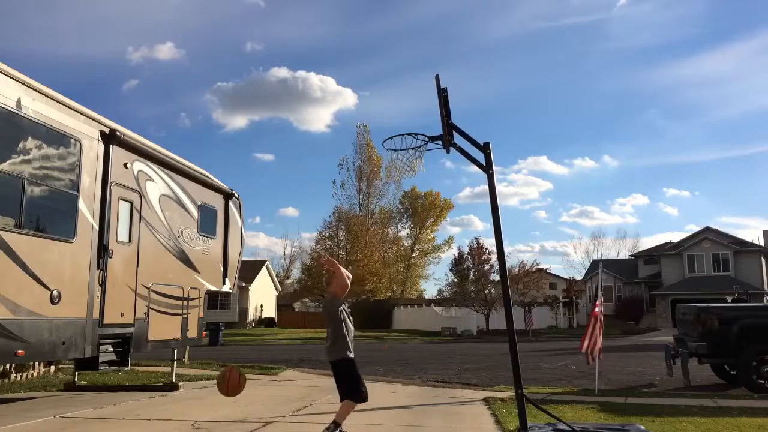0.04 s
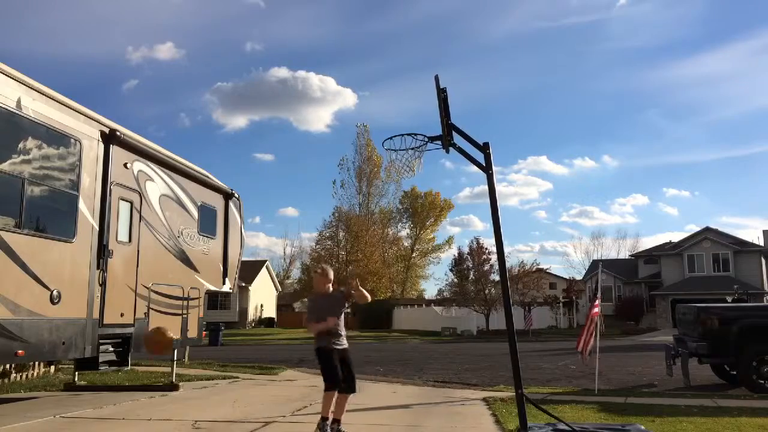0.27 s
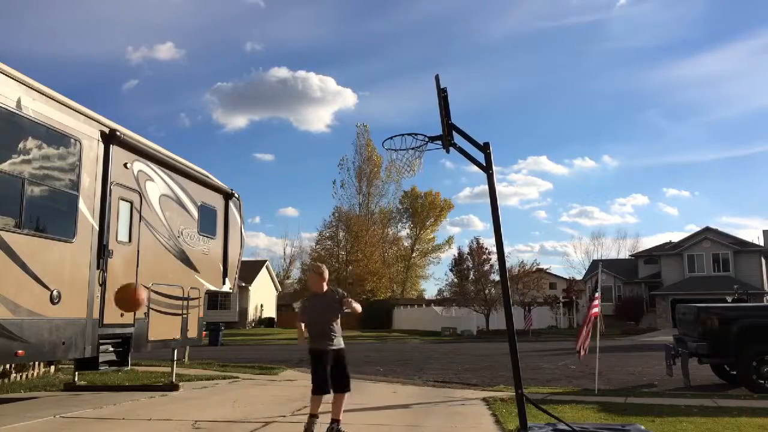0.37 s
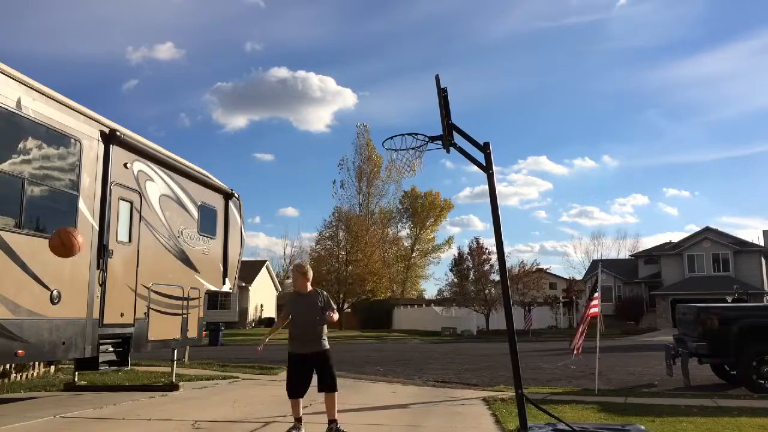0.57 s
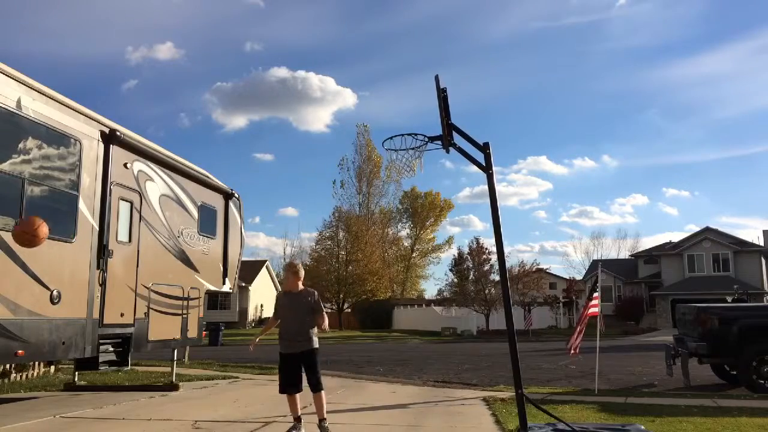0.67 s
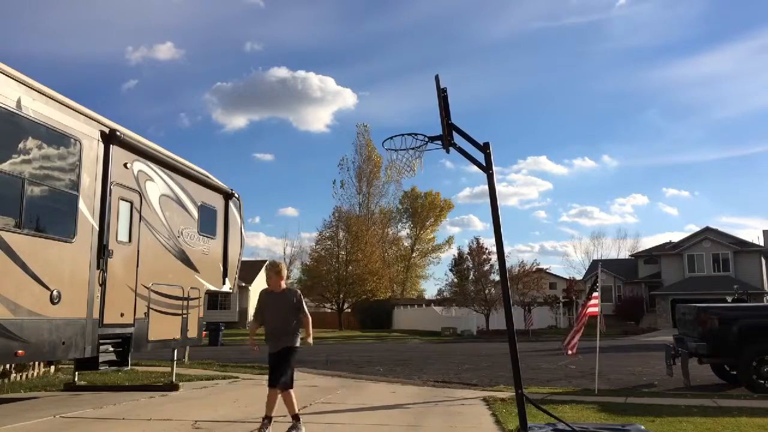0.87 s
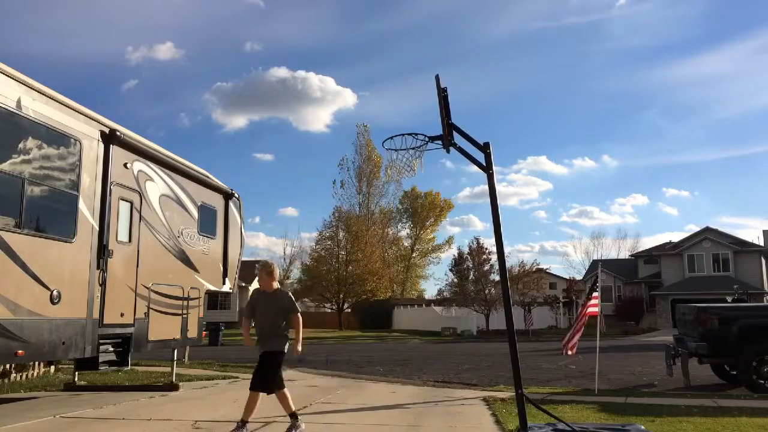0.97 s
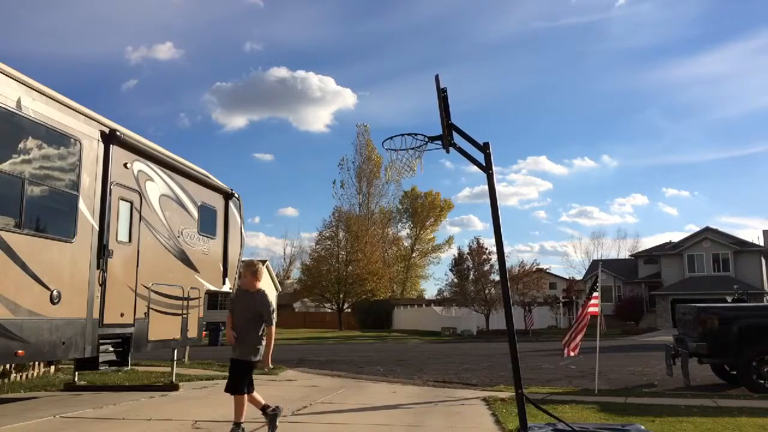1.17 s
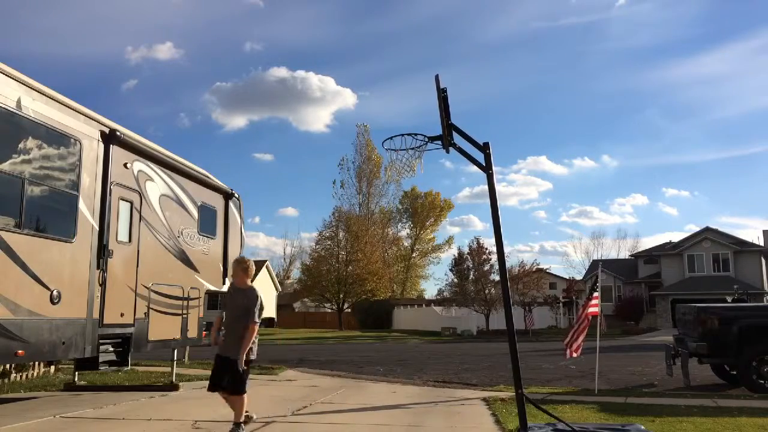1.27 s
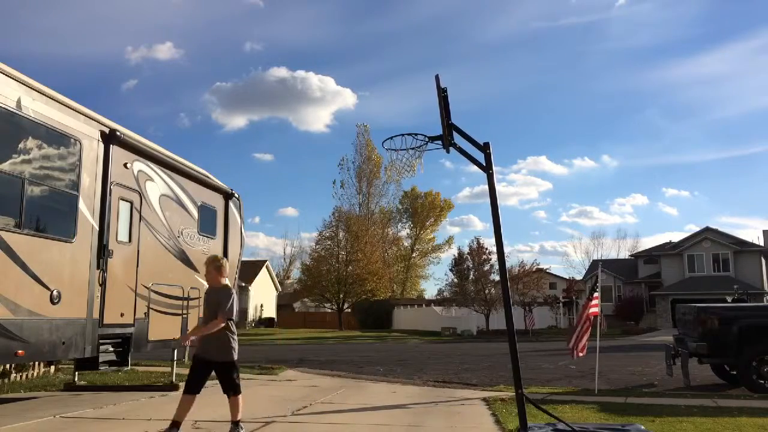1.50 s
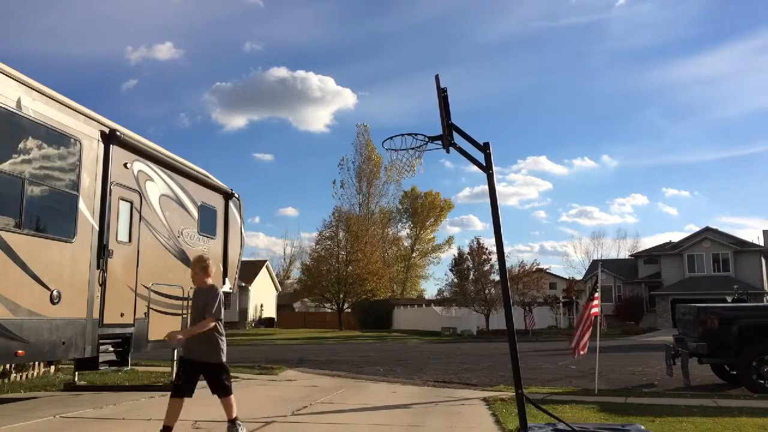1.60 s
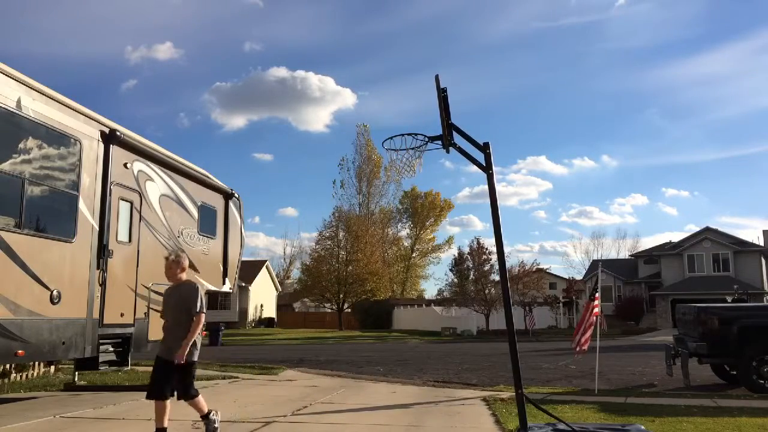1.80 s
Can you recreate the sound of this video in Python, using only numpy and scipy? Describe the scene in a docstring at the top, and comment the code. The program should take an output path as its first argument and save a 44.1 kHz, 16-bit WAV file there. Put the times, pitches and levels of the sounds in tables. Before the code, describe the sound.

A basketball bounces twice on a concrete driveway, close to the microphone. The first thud dies quickly and the second sets off a hollow boom. Faint steps and scuffs follow each, over a low hum of distant traffic.

```python
"""Basketball bouncing twice on a driveway

A basketball bounces twice on concrete, close by: a noisy slap, a low thump and decaying sines for the ball's ring.
The first bounce dies quickly in the open; the second sets a hollow space booming, probably an open garage,
made of fading noise and standing waves. Shoes step and scuff further off, as shaped bursts of noise,
over the hum of distant traffic, a steady noise."""
import sys
import numpy as np
from scipy import signal
from scipy.io import wavfile

SR = 44100
rng = np.random.default_rng(int(sys.argv[2]) if len(sys.argv) > 2 else 0)


def log_audio(samples):
    """Write samples as a 16-bit WAV file to the path given in sys.argv[1]."""
    # one column per channel
    frames = np.atleast_2d(samples).T
    # limit to full scale, then quantise
    limited = np.clip(frames, -1, 1)
    pcm = np.round(limited * 32767).astype(np.int16)
    wavfile.write(sys.argv[1], SR, pcm)


N = 81585  # length in samples
T = np.arange(N) / SR  # time in seconds


def bounce(start_s, level_db, slap_db, thump_hz, ring_ratio, echo_s, echo_db, scatter_db, tail_db):
    """The ball squeezes the air under it, slaps, thumps and rings; a near wall repeats it, which sounds hollow."""
    # ring of the ball's skin and the air inside it, before the bounce's pitch ratio: pitch_hz, level_db, t60_s
    ball_modes = [(171.5, -25, .1), (296.2, -20.5, 0.052), (384, -29.5, 0.0804), (601.6, -24, 0.084),
                  (730, -42, 0.048), (938, -49.5, .15), (1058, -37, 0.064), (1160, -38, .1),
                  (1365, -25.5, 0.051), (1630, -30, 0.051), (1827, -33.5, 0.052), (2502, -36, 0.041),
                  (2818, -32, 0.052), (2940, -36, .09), (5324, -40.5, .1)]
    # gritty crack of the skin on concrete: pitch_hz, level_db (per octave), t60_s
    crack_colour = [(500, -40.5, 0.019), (1501, -27.5, 0.042), (3003, -23.5, .014), (5030, -20.5, 0.017),
                    (7870, -22, 0.015), (12500, -16.5, 0.011), (15000, -27.5, 0.022)]
    # spray of reflections from the ground and things nearby: pitch_hz, level_db (per octave)
    spray_colour = [(200, -49), (500, -30.5), (900, -40.5), (1800, -30.5), (3000, -38), (5000, -26),
                    (8000, -30.5), (14000, -34.5)]
    slap_lag_s, body_lag_s = 0.00015, 0.0003

    # The air pressure builds up to the hit, then stops short.
    squeeze_shape = np.exp(-np.abs(T - start_s) / 0.0024) * (T < start_s + slap_lag_s)
    squeeze = -from_db(-23.5) * squeeze_shape

    # The slap is a very short pulse that swings back more weakly.
    slap_width_s, recoil_lag_s, recoil_share = 0.000028, 0.00018, 0.4
    hit = np.exp(-((T - slap_lag_s) / slap_width_s) ** 2 / 2)
    recoil = np.exp(-((T - slap_lag_s - recoil_lag_s) / slap_width_s) ** 2 / 2)
    slap = from_db(0.5) * (recoil_share * recoil - hit)
    crack = delay(noise(crack_colour), body_lag_s)

    thump = ring([(thump_hz, -14, 0.065)])
    tuned_modes = [(hz * ring_ratio, db, t60_s) for hz, db, t60_s in ball_modes]
    body = delay(thump + ring(tuned_modes), body_lag_s)

    # Two separate sprays: one direct, one scattered back by the wall.
    spray_shape = swell(0.00094) * fade(0.065)
    spray = noise(spray_colour) * spray_shape
    scatter = noise(spray_colour) * spray_shape
    wall = delay(from_db(echo_db) * body + from_db(scatter_db) * scatter, echo_s)

    impact = from_db(slap_db) * (slap + crack + spray)
    sound = impact + body + wall + from_db(tail_db) * outdoors()
    return from_db(level_db) * (squeeze + delay(sound, start_s))


def garage():
    """The hollow space answers late with a long boom, standing waves and a few wall slaps."""
    # diffuse boom: pitch_hz, level_db (per octave), t60_s
    boom_colour = [(45, -47.5, 3.2), (107.3, -26, 0.83), (168, -26, 1.03), (270, -29.5, 1.02),
                   (460, -39.5, 1.33), (770, -44.5, 1.5), (1700, -39.5, 0.77), (2690, -43.5, 0.88),
                   (3770, -47.5, 0.48), (7400, -52.5, 0.64), (13900, -82, 0.26)]
    # standing waves between the walls: pitch_hz, level_db, t60_s
    standing_waves = [(91.5, -34.5, 0.35), (144.8, -25.5, 1.18), (155.3, -47, 0.62), (226.6, -34, 1.5),
                      (248.7, -34, .8), (285, -41.5, 3.3), (372, -44.5, 1.37), (604, -49.5, 1.4),
                      (949, -45, 1.08), (1340, -49, 0.44), (1770, -44, 0.77)]
    # slaps off the walls: delay_s, level_db
    wall_slaps = [(0.055, 3.5), (.075, 3.5), (.156, 0.5), (.244, -10.5), (.283, -19)]
    # colour of a wall slap: pitch_hz, level_db (per octave), t60_s
    slap_colour = [(298, -52, 0.093), (990, -48.5, 0.1), (2280, -40.5, .22), (4900, -49, 0.14),
                   (8950, -52.5, 0.078), (14000, -60, 0.077)]
    boom = (noise(boom_colour) + ring(standing_waves)) * swell(0.016)
    sound = delay(boom, 0.052)
    for delay_s, level_db in wall_slaps:
        slap = noise(slap_colour) * swell(0.00089)
        sound = sound + from_db(level_db) * delay(slap, delay_s)
    return sound


def outdoors():
    """The driveway answers at once, the house front soon after, the far side of the street last."""
    # All three tables: pitch_hz, level_db (per octave), t60_s
    # tail between the camper and the house
    driveway = [(50, -40, 0.42), (112.5, -28, 0.41), (171.8, -33, .33), (254, -36.5, 0.4),
                (520, -32.5, 0.3), (970, -40.5, .38), (2010, -40.5, 0.4), (3970, -41.5, 0.33),
                (8000, -42, .25), (14200, -46, .21)]
    # dull answer of the house front
    house = [(50, -44, 0.096), (110, -39.5, 0.14), (220, -51.5, .22), (432, -47, 0.27), (608, -33.5, .26),
             (890, -54, 0.11), (3000, -75, 0.082), (12000, -67, 0.23)]
    # faint return from the houses across the street
    street = [(60, -66.5, 1.7), (124, -51.5, 1), (283, -77, 1.7), (600, -68, 1.1), (1960, -73.5, 1.8),
              (3700, -75, 0.72), (5600, -78.5, 1.4), (12000, -101, 0.48)]
    near = noise(driveway) * swell(0.005)
    front = delay(noise(house) * swell(0.016), 0.072)
    far = delay(noise(street) * swell(0.0073), 0.225)
    return near + front + far


def step(start_s, level_db, rise_s, t60_s, tilt_db):
    """A sole rubs or knocks the concrete: a noise burst with its own onset, decay and brightness."""
    # colour of a sole on concrete, before the tilt: pitch_hz, level_db (per octave)
    shoe_colour = [(40, -49), (150, -22), (300, -3), (550, -1.5), (1000, -9), (2300, 2.5), (5000, -4.5),
                   (9000, -12.5), (14000, -8.5)]
    pivot_hz = 1960  # the tilt leaves this pitch unchanged
    tilted = [(hz, db + tilt_db * np.log2(hz / pivot_hz)) for hz, db in shoe_colour]
    burst = noise(tilted) * swell(rise_s) * fade(t60_s)
    return from_db(level_db) * delay(burst, start_s)


def traffic():
    """Many distant vehicles blur into a steady low noise."""
    # colour of the hum: pitch_hz, level_db (per octave)
    hum_colour = [(25, -69), (60, -65), (130, -54.5), (250, -68), (450, -64), (750, -59), (1200, -63),
                  (2000, -75), (4000, -82.5), (8000, -82.5), (14000, -84.5)]
    return noise(hum_colour)


def ring(modes):
    """Struck modes as decaying sines; neighbours swing in opposite directions."""
    sound = 0
    for k, (hz, db, t60_s) in enumerate(modes):
        sine = np.sin(2 * np.pi * hz * T)
        sound = sound + (-1) ** k * from_db(db) * fade(t60_s) * sine
    return sound


def noise(table):
    """Third-octave bands of noise at the table's levels; with a t60 column each band dies at its own rate."""
    hz, db, *t60_s = np.transpose(table)
    # Neighbouring bands take turns between two independent noises.
    white = rng.standard_normal((2, N + SR // 4))
    edges = 22 * 2 ** (np.arange(30) / 3)
    out = 0
    for k, (low, high) in enumerate(zip(edges, edges[1:])):
        band_filter = signal.butter(2, [low, high], "band", fs=SR, output="sos")
        band = signal.sosfilt(band_filter, white[k % 2])[-N:]  # drop the filter's start-up
        band = band / band.std() / np.sqrt(3)  # three bands share an octave's power
        centre = np.log(low * high) / 2  # middle pitch, as a logarithm
        band = band * from_db(np.interp(centre, np.log(hz), db))
        if t60_s:
            band = band * fade(np.interp(centre, np.log(hz), t60_s[0]))
        out = out + band
    return out


def from_db(db):
    """Decibels to gain."""
    return 10 ** (np.asarray(db) / 20)


def fade(t60_s):
    """Exponential decay by 60 dB in t60_s, which is at least 2 ms."""
    return from_db(-60 * T / np.maximum(t60_s, 0.002))


def swell(rise_s):
    """Smooth onset that reaches about 63 % after rise_s."""
    return 1 - np.exp(-(T / max(rise_s, 1e-5)) ** 2)


def delay(x, delay_s):
    """The same sound, delay_s seconds later."""
    silence = np.zeros(max(int(round(delay_s * SR)), 0))
    return np.concatenate([silence, x])[:N]


def scene():
    """Bounces with the garage's answer, footsteps and traffic."""
    # bounces: start_s, level_db, slap_db, thump_hz, ring_pitch_ratio, wall_echo_delay_s, wall_echo_db,
    # echo_spray_db, driveway_tail_db, garage_db
    bounces = [(0.2086, 0.5, -5, 99.2, 0.95, .0073, 0, -2.5, 3, -68),
               (1.3504, -1.5, -2.5, 114.4, 0.99, .0068, 1, -10.5, 1, -0.5)]
    # shoes on concrete: start_s, level_db, rise_s, t60_s, tilt_db (per octave)
    steps = [(.576, -52.5, 0.00044, 0.031, -7), (0.673, -60.5, 0.016, 0.21, 5.3),
             (.705, -60, 0.0069, 0.15, -0.5), (.74, -72, .005, 0.076, 2.5), (1.057, -64.5, 0.0022, 0.16, 0),
             (1.69, -63, 0.006, 1, -4.5), (1.792, -57.5, 0.00048, 0.05, -4)]
    answer = garage()
    mix = traffic()
    for *settings, garage_db in bounces:
        mix = mix + bounce(*settings) + from_db(garage_db) * delay(answer, settings[0])
    for row in steps:
        mix = mix + step(*row)
    return mix[None]  # one channel


def record(dry):
    """The small microphone loses the deepest bass; the top is cut steeply."""
    low_cut_hz, top_cut_hz = 52, 15200
    low_cut = signal.butter(2, low_cut_hz, "high", fs=SR, output="sos")
    thin = signal.sosfilt(low_cut, dry)
    top_cut = signal.firwin(141, top_cut_hz, fs=SR)
    return signal.fftconvolve(thin, top_cut[None], mode="same")


dry = scene()
out = record(dry)
log_audio(out)
```